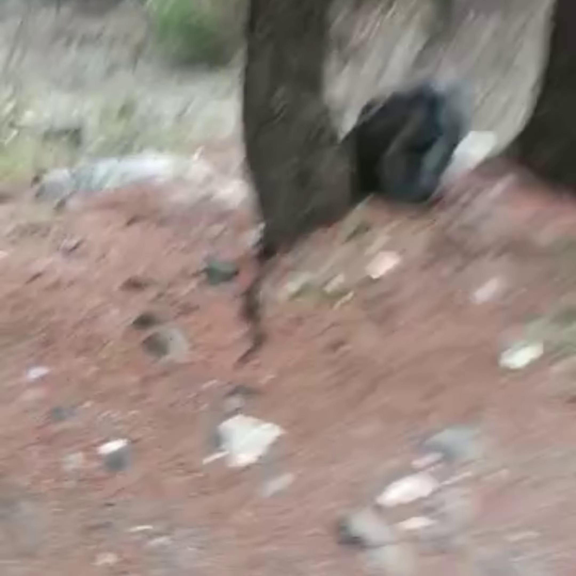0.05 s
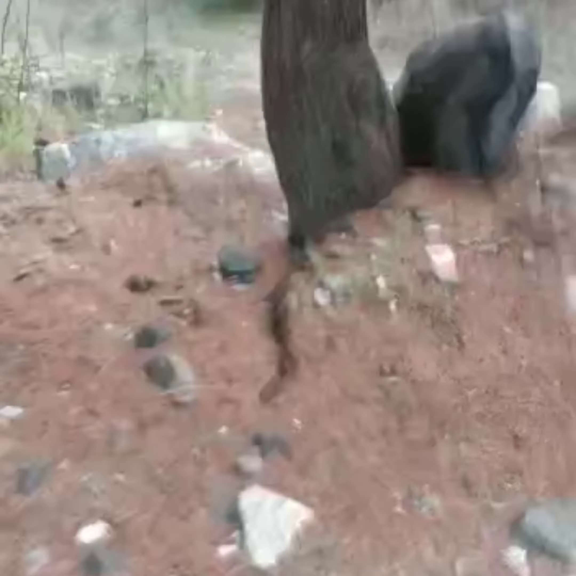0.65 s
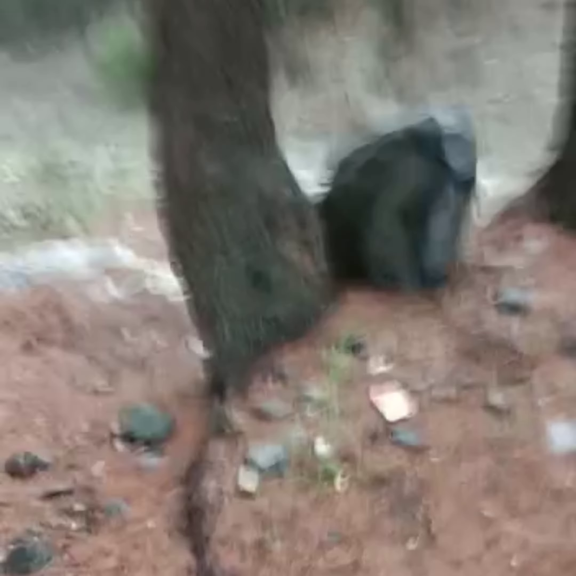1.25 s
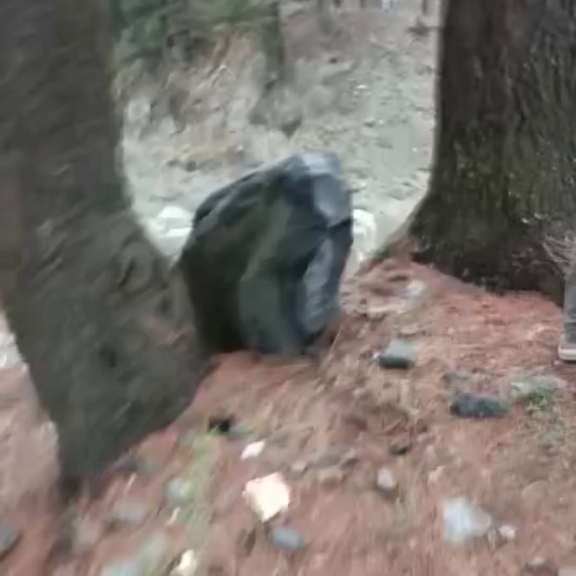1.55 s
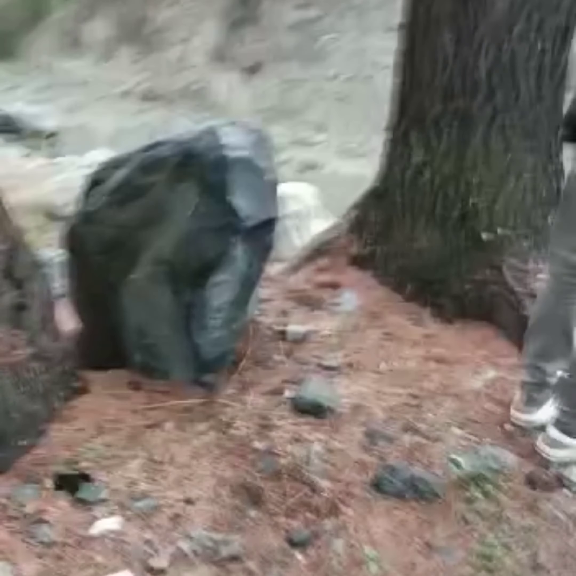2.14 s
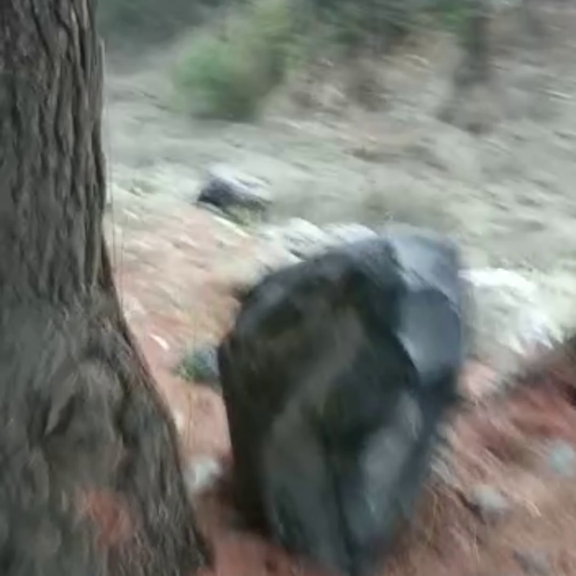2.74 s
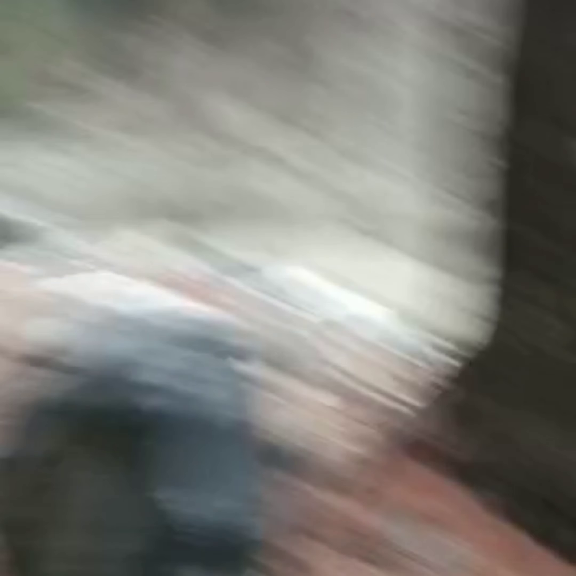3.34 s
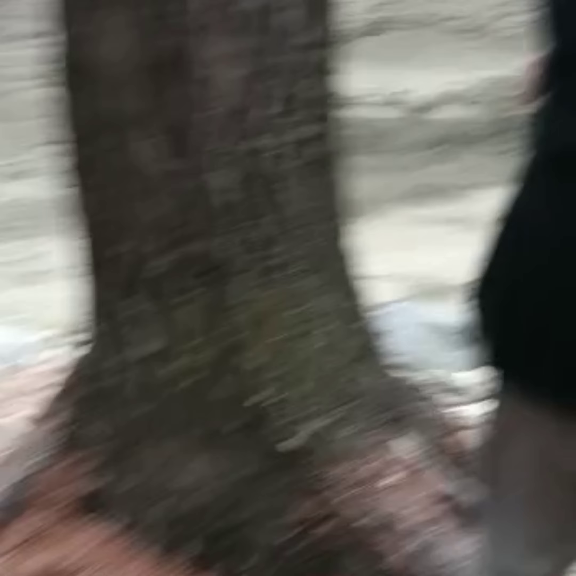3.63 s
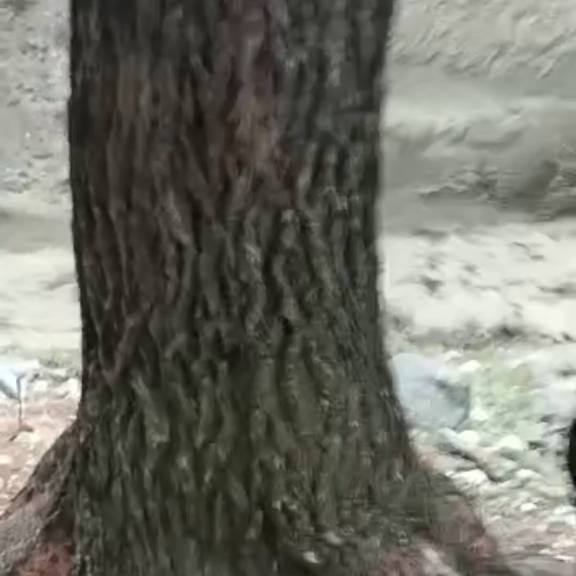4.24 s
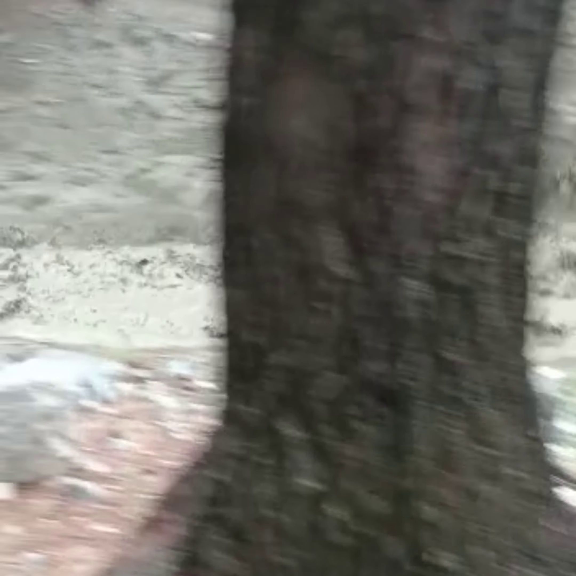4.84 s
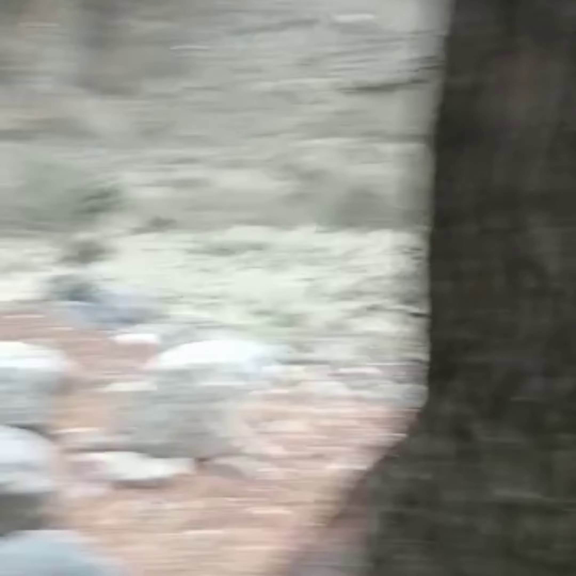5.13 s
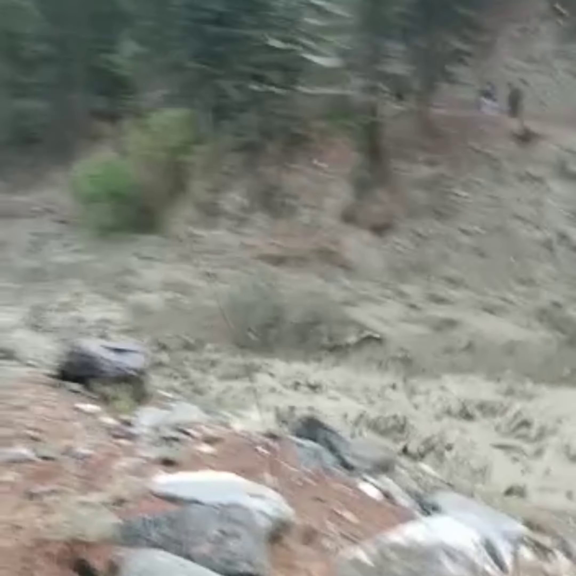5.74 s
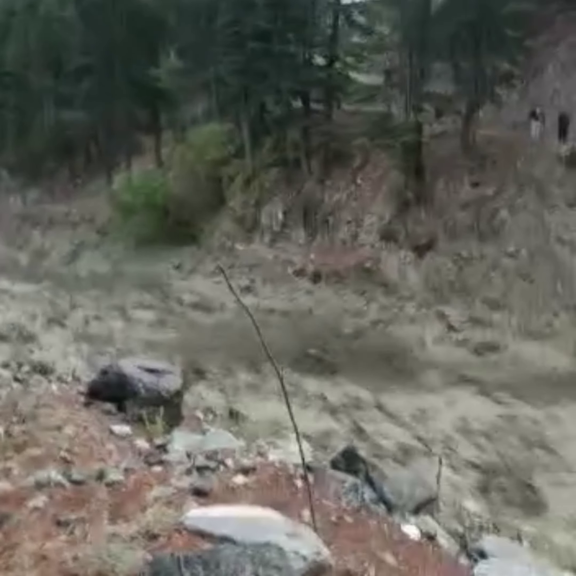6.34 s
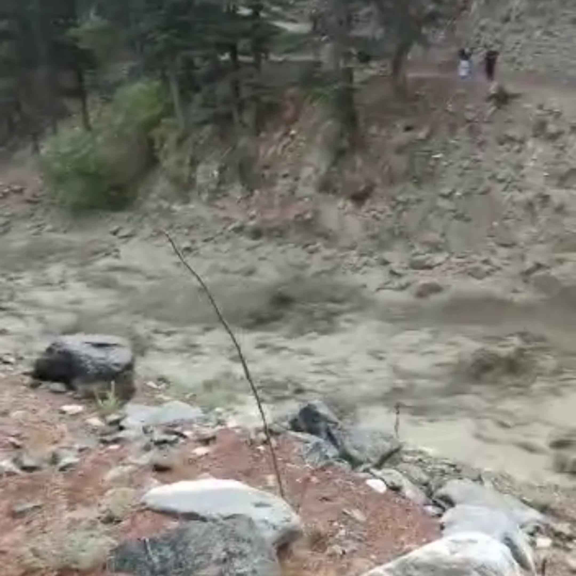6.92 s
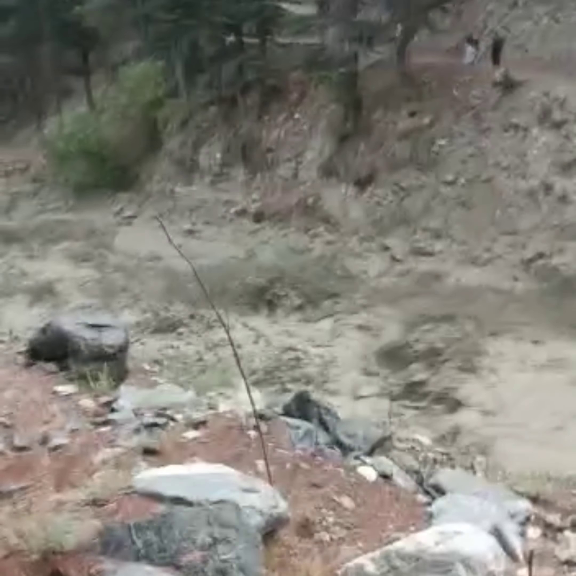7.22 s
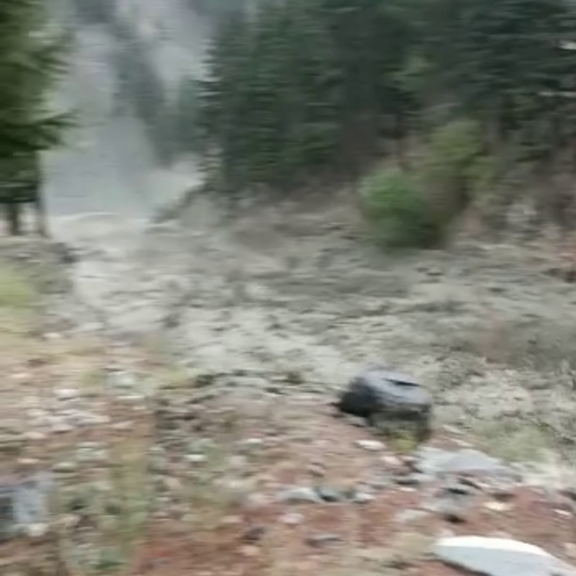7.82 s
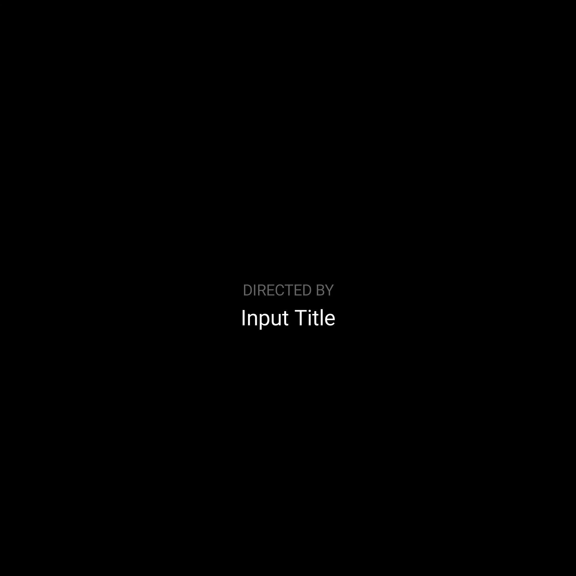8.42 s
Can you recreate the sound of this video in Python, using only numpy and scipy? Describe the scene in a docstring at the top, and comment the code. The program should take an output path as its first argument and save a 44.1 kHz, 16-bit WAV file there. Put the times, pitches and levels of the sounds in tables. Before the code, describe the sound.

A loud torrent of muddy water tears down a rocky mountain channel, heard outdoors from a wooded bank. Boulders rumble along the bed beneath the deep roar of plunging water, while waves churn, splash and throw a fine fizz of spray. The sound stays steady, with small surges and brief dips as the microphone moves past tree trunks. The churning grows slightly stronger near the edge, then everything stops abruptly.

```python
"""A muddy flood tears down a rocky channel, heard from a wooded bank on a walk towards the edge.
Rolling boulders rumble and plunging water roars. Waves trap bubbles that ring as damped resonators;
crests break into a rush of splashes and a fizz of droplets. Trunks and the bank shade the brighter
sounds until the view opens, and interfering paths colour them. The sound stops abruptly near the end."""
import sys
import numpy as np
from scipy import signal
from scipy.fft import rfft
from scipy.io import wavfile
from scipy.ndimage import uniform_filter1d, minimum_filter1d, map_coordinates

SR = 44100
rng = np.random.default_rng(int(sys.argv[2]) if len(sys.argv) > 2 else 0)


def int16_out(signal):
    """Quantize to a 16-bit WAV file."""
    q = np.round(np.clip(np.atleast_2d(signal).T, -1, 1) * 32767)
    wavfile.write(sys.argv[1], SR, q.astype(np.int16))


N = 373523


def gain_of(db):
    """The decibel law: amplitude grows tenfold every 20 dB."""
    return 10 ** (np.asarray(db) / 20)


def unit_rms(x):
    """Normalisation to an rms of one."""
    return x / np.sqrt(np.mean(x ** 2) + 1e-20)


def follow(rows, t):
    """Linear interpolation of each column of a table at the times t."""
    times, *columns = np.transpose(rows)
    return [np.interp(t, times, column) for column in columns]


def hump(t, peak_s, rise_s, fall_s):
    """A Gaussian envelope: one at the peak, 1/e at rise_s before it and fall_s after it."""
    return np.exp(-((t - peak_s) / np.where(t < peak_s, rise_s, fall_s)) ** 2)


def coloured(x, spectrum):
    """Spectral shaping on a log-frequency axis, silent beyond the table's ends, at an rms of one."""
    knots_hz, knots_db = np.transpose(spectrum)
    hz = np.fft.rfftfreq(2 * N, 1 / SR)
    shape_db = np.interp(np.log(hz + 1), np.log(knots_hz + 1), knots_db, left=-np.inf, right=-np.inf)
    return unit_rms(np.fft.irfft(rfft(x, 2 * N) * gain_of(shape_db))[:N])


def turbulence(patch_db, patch_hz, patch_s):
    """Countless tiny impacts superpose into Gaussian noise, modulated in patches of time and pitch."""
    hz, t, bins = signal.stft(rng.standard_normal(N), SR, nperseg=512, noverlap=384)
    patches = uniform_filter1d(rng.standard_normal(bins.shape), max(1, round(patch_hz / hz[1])), axis=0)
    patches = unit_rms(uniform_filter1d(patches, max(1, round(patch_s / t[1])), axis=1))
    return unit_rms(signal.istft(bins * gain_of(patch_db * patches), nperseg=512, noverlap=384)[1][:N])


def rings(per_s, low_hz, high_hz, decay_cycles, spread_db, glide=0, count=32):
    """Damped resonators excited at random, mostly weakly; a glide raises the pitch as each decays."""
    chance, pitch_draw, size_draw = rng.random((3, N))
    strength = gain_of(spread_db * np.minimum(-np.log1p(-size_draw), np.pi))
    impulses = (chance < per_s / SR) * strength
    out = np.zeros(N)
    for k, hz in enumerate(np.geomspace(low_hz, high_hz, count)):
        age = np.arange(0, 2 * np.pi, hz / (decay_cycles * SR))  # in decay times
        ring = np.exp(-age) * np.sin(2 * np.pi * decay_cycles * age * (1 + glide * age))
        out += (-1) ** k * hz * signal.oaconvolve(impulses * (np.floor(pitch_draw * count) == k), ring)[:N]
    return unit_rms(out)


def rumble(level_db):
    """Friction and impact: boulders grind and knock along the bed, damped by mud."""
    # spectrum of the bed: (frequency [Hz], relative level [dB])
    spectrum = [(15, -48.5), (30, -27), (42, -11.5), (55, -10), (78, -2.5), (105, 0.5), (130, -9.5),
                (200, -33)]
    gravel = unit_rms(rng.standard_normal(N))
    boulders = rings(per_s=160, low_hz=57, high_hz=170, decay_cycles=3.1, spread_db=2)
    return gain_of(level_db + 0.5) * coloured(gravel + gain_of(-11) * boulders, spectrum)


def roar(level_db):
    """Cavity resonance: water plunges into hollows, where large pockets of air thump."""
    # spectrum of the plunging water: (frequency [Hz], relative level [dB])
    spectrum = [(60, -34.5), (100, -4.5), (122, 1), (160, 0.5), (200, -1), (250, -2.2), (330, -5),
                (450, -11.5), (620, -21), (1200, -63)]
    water = turbulence(patch_db=-0.14, patch_hz=260, patch_s=0.17)
    pockets = rings(per_s=350, low_hz=132.8, high_hz=562, decay_cycles=2.86, spread_db=2.5)
    return gain_of(level_db + 0.17) * coloured(water + gain_of(-16.5) * pockets, spectrum)


def churn(level_db):
    """Air entrainment: standing waves fold over and trap large, quickly damped bubbles."""
    # spectrum of the folding waves: (frequency [Hz], relative level [dB])
    spectrum = [(200, -12.5), (480, 2.5), (640, 3), (820, 4), (1100, -1), (1400, -8.5), (2400, -32.5)]
    water = turbulence(patch_db=0.1, patch_hz=400, patch_s=0.04)
    bubbles = rings(per_s=450, low_hz=380, high_hz=1700, decay_cycles=4.5, spread_db=3.5, glide=0.015)
    return gain_of(level_db + 0.33) * coloured(water + gain_of(-14) * bubbles, spectrum)


def rush(level_db):
    """Wave breaking: crests burst on the rocks into broadband foam and briefly ringing splashes."""
    # spectrum of the breaking crests: (frequency [Hz], relative level [dB])
    spectrum = [(550, -11.5), (1100, -0.5), (1450, 0), (1700, 0), (2050, 1.36), (2350, -2), (2750, -8),
                (3400, -11), (4100, -11), (5400, -14), (6900, -17.5), (7400, -33.5), (10000, -46.5)]
    foam = turbulence(patch_db=0.73, patch_hz=750, patch_s=0.052)
    splashes = rings(per_s=2200, low_hz=1080, high_hz=7050, decay_cycles=2.6, spread_db=6.5, glide=0.004)
    return gain_of(level_db + 0.7) * coloured(foam + gain_of(-16.5) * splashes, spectrum)


def spray(level_db, top_db):
    """Drop impact: flung droplets fall back as a fine fizz, whose top octave is shifted by top_db."""
    # spectrum of the fizz: (frequency [Hz], relative level [dB])
    spectrum = [(4500, -25), (6600, -7), (7300, -1), (8000, -.6), (8700, 0), (9300, -2.5), (10000, -8),
                (10700, -10.5), (11500, -14), (12500, -12.7), (16000, -14.5)]
    mist = turbulence(patch_db=1.3, patch_hz=600, patch_s=0.063)
    droplets = rings(per_s=3000, low_hz=6000, high_hz=15000, decay_cycles=3, spread_db=4)
    fizz = coloured(mist + gain_of(-9.5) * droplets, spectrum)
    top = signal.sosfiltfilt(signal.butter(4, 10000, "high", fs=SR, output="sos"), fizz)
    return gain_of(level_db + 0.6) * (fizz + (gain_of(top_db) - 1) * top)


def heave(t, depth_db, slow_hz, fast_hz):
    """Random amplitude modulation, in dB, as lesser waves come and go."""
    rates = np.geomspace(slow_hz, fast_hz, 16)
    wander = sum(np.sin(2 * np.pi * (hz * t + rng.random())) / np.sqrt(hz) for hz in rates)
    return depth_db * unit_rms(wander)


def reflected(x, t, share, delay_s, sway_s):
    """Comb filtering: a weak reflection off bark and stone joins x, its delay swaying with the walk."""
    rates = np.geomspace(0.15, 1.6, 8)
    sway = unit_rms(sum(np.sin(2 * np.pi * (hz * t + rng.random())) / hz for hz in rates))
    return x + share * map_coordinates(x, [(t - delay_s - sway_s * sway) * SR], order=3)


def shaded(x, width_octaves):
    """Interference: paths over the ground and round the trunks cancel and add, shifting with the walk."""
    # first interference dip: (time [s], centre [Hz], depth [dB])
    dips = [(0, 680, 0.5), (1.0, 720, 3), (1.7, 880, 1.5), (2.5, 760, 1), (3.0, 1390, 0.5),
            (3.6, 1400, 1.5), (4.2, 1360, 3.5), (4.8, 1480, 1.5), (5.3, 1390, 3), (5.7, 1400, -1),
            (6.3, 440, 0.5), (7.1, 440, 1.5), (7.9, 400, 1.5)]
    hz, t, bins = signal.stft(x, SR, nperseg=1024, noverlap=768)
    centre_hz, depth_db = follow(dips, t)
    octaves = np.log2((hz[:, None] + 1) / centre_hz)
    dip, crest, second_dip = (np.exp(-((octaves - at) / width_octaves) ** 2) for at in (0, 0.7, 1.35))
    colour_db = depth_db * (0.15 * crest - dip - 0.14 * second_dip)
    return signal.istft(bins * gain_of(colour_db), nperseg=1024, noverlap=768)[1][:N]


def surges(t):
    """Amplitude modulation by breakers and lulls, in dB for the bass and for the treble."""
    # big waves build and collapse: (time [s], bass rise [dB], treble rise [dB])
    breakers = [(0.64, 1.5, 0.5), (1.01, 2, 0.5), (2.18, 1, 0.5), (4.75, 2.5, 2.5), (5.27, 1, 1.5),
                (5.95, -0.5, 2), (7.35, 1.2, 1.3), (7.68, 1, 1.5)]
    # brief dips, deepest behind a trunk: (time [s], half-width [s], bass drop [dB], treble drop [dB])
    lulls = [(0.807, 0.12, 0, 1), (1.758, 0.058, 3, 3), (3.583, 0.093, 3.3, 4.5), (5.11, 0.027, 4, 2),
             (5.427, 0.05, 2.5, 2), (6.02, 0.058, 1, 2.5), (7.48, 0.06, 2, 0.5)]
    lifted = sum(np.outer(db, hump(t, s, rise_s=0.09, fall_s=0.0455)) for s, *db in breakers)
    lowered = sum(np.outer(db, hump(t, s, half_s, half_s)) for s, half_s, *db in lulls)
    return lifted - lowered


def flares(t):
    """Amplitude modulation of the spray, in dB: the fizz flares up briefly."""
    # swells of the fizz: (time [s], half-width [s], rise [dB])
    swells = [(1.17, 0.11, 4), (2.058, 0.073, 3), (2.59, 0.11, 4.5), (3.82, 0.11, 2.5), (6.78, 0.05, 2)]
    return sum(rise_db * hump(t, s, half_s, half_s) for s, half_s, rise_db in swells)


def gurgles(t):
    """Bubble resonance: a folding wave sheds bubbles of much the same size, hence of similar pitch."""
    # bubble clusters of nearer waves: (time [s], nominal pitch [Hz], level [dB], half-width [s])
    clusters = [(2.89, 770, -22, 0.068), (5.883, 614, -28, 0.037), (6.226, 826, -23, 0.096),
                (7.14, 760, -23.5, 0.077)]
    out = np.zeros(N)
    for s, hz, db, half_s in clusters:
        bubbles = rings(per_s=220, low_hz=hz / 1.4, high_hz=hz * 1.07, decay_cycles=10,
                        spread_db=6.5, glide=0.0086, count=4)
        out += gain_of(db) * hump(t, s, half_s, half_s) * bubbles
    return out


def scene():
    """Superposition of the torrent's layers, from bed to spray, as heard from the bank."""
    # weight of the flow: (time [s], rumble level [dB], roar level [dB])
    flow = [(0, -19, -13), (0.9, -22, -14), (1.35, -20.5, -11), (2.1, -24.3, -13.5), (2.6, -24.5, -13.5),
            (3.0, -20, -12), (3.85, -18.5, -11.5), (4.3, -22.5, -12.5), (5.6, -17, -13.5),
            (6.2, -18.5, -14), (6.8, -22, -14), (7.9, -18, -14)]
    # waves heard past the bank: (time [s], churn level [dB], rush level [dB], spray level [dB])
    exposure = [(0, -22, -22.5, -41), (1.1, -23, -22, -41.7), (1.42, -23, -22.5, -43), (2.1, -24, -23, -40),
                (2.9, -23.5, -24.5, -43.3), (3.35, -21, -23.5, -42), (4.3, -24.5, -25, -43),
                (5.3, -23.5, -24, -42.5), (6.1, -20.5, -23, -40.5), (6.65, -21, -24, -42),
                (7.2, -19.5, -23, -39.5), (7.65, -19, -21.5, -39), (7.92, -20, -23.5, -40.5)]
    t = np.arange(N) / SR
    rumble_db, roar_db = follow(flow, t)
    churn_db, rush_db, spray_db = follow(exposure, t)
    bass_db, treble_db = surges(t) + heave(t, depth_db=0.54, slow_hz=1.8, fast_hz=9)
    tilt_db = treble_db - bass_db  # brighter layers take a larger share
    bed = rumble(rumble_db + bass_db)
    body = roar(roar_db + bass_db + 0.1 * tilt_db)
    waves = churn(churn_db + bass_db + 0.55 * tilt_db)
    crests = rush(rush_db + bass_db + 0.92 * tilt_db)
    top_db = -3 + 0.57 * t - 0.35 * treble_db  # the top octave grows towards the edge and surges less
    fizz = spray(spray_db + treble_db + flares(t), top_db)
    surface = waves + crests + fizz + gurgles(t)
    torrent = bed + body + reflected(surface, t, share=0.12, delay_s=0.001812, sway_s=0.00032)
    return shaded(torrent, width_octaves=0.44)[None]


def record(dry):
    """Fast limiting rounds the highest peaks; an abrupt stop and a low-pass filter follow."""
    ceiling, cutoff_hz = 0.9, 15800
    stop_s, fall_db_per_s = 7.936, 2200
    allowed_gain = ceiling / np.maximum(abs(dry), ceiling)
    limited = dry * uniform_filter1d(minimum_filter1d(allowed_gain, size=500), size=500)
    fade = gain_of(-fall_db_per_s * np.maximum(np.arange(N) / SR - stop_s, 0))
    low_pass = signal.firwin(511, cutoff_hz, window=("kaiser", 10), fs=SR)
    return signal.oaconvolve(limited * fade, low_pass[None], "same")


dry = scene()
out = record(dry)
int16_out(out)
```